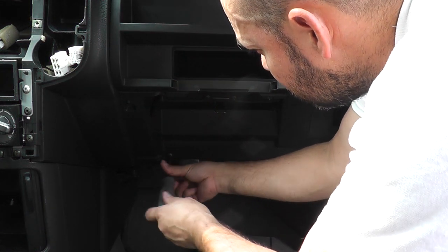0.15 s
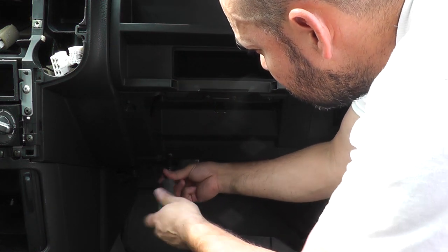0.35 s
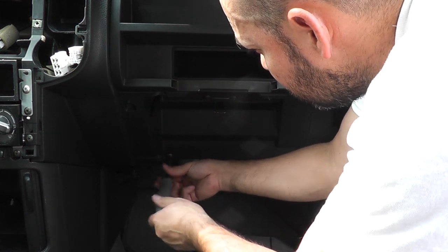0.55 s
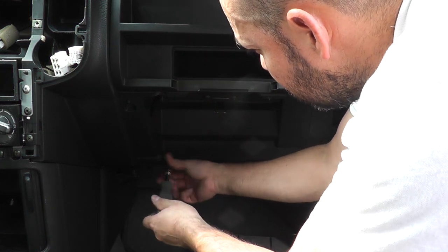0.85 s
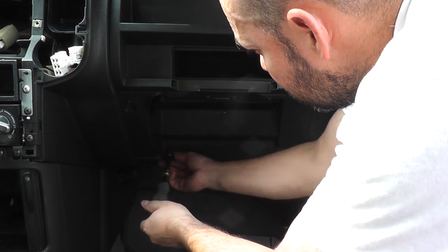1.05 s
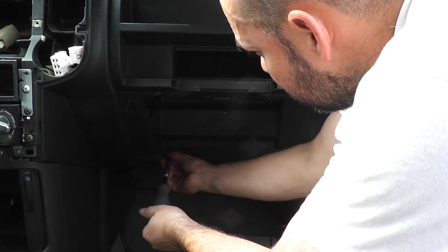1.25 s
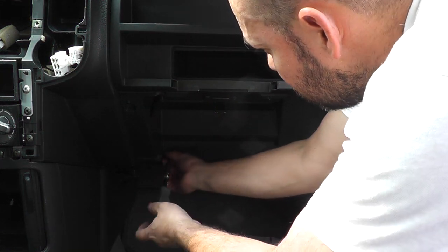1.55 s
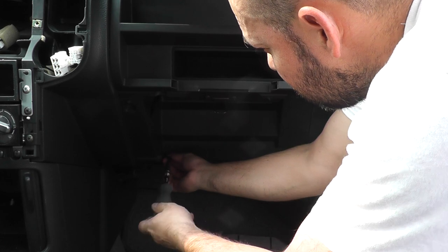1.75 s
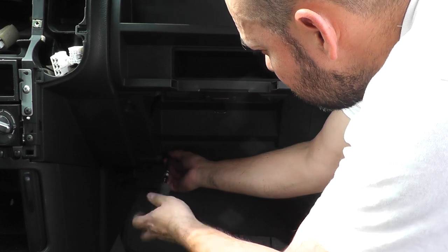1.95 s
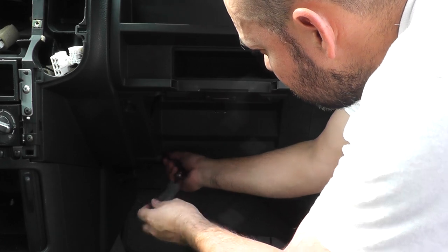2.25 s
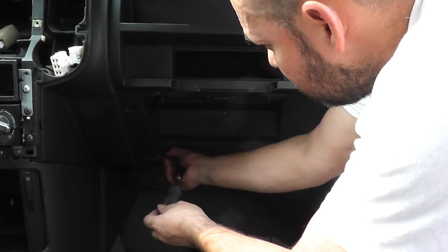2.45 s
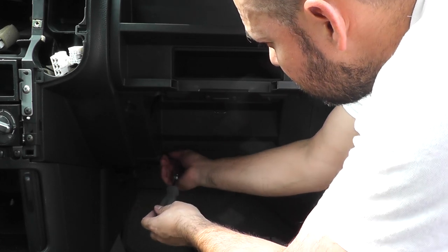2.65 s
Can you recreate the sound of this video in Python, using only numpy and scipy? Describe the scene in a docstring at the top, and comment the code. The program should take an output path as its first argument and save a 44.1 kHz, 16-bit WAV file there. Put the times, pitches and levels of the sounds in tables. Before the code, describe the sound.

Close by in a small, dry car cabin, a screwdriver loosens a screw from a plastic dashboard panel. Light knocks and handling friction come first, ease off, then give way to squeaky metallic clicks over a faint rumble and hiss.

```python
"""Unscrewing a dashboard panel

A screwdriver backs a screw out of a plastic panel inside a parked car. Friction of hand, handle
and thread drives the hollow panel's resonances, and knocks of the tool set its damped modes ringing.
The steel tip skips in the screw head, mostly late on, and stick-slip motion gives bright, squeaky
ticks. The small cabin is nearly dry, with a faint rumble and hiss."""
import sys
import numpy as np
from scipy import signal
from scipy.fft import rfft, irfft
from scipy.io import wavfile

SR = 44100
rng = np.random.default_rng(int(sys.argv[2]) if len(sys.argv) > 2 else 0)


def digitize_waveform(pressure):
    """Quantize a signal to 16-bit integers and store it at the path in sys.argv[1].

    Rows of a 2-D input are taken as channels; values are limited to [-1, 1].
    """
    field = np.atleast_2d(pressure).T
    bounded = np.clip(field, -1, 1)
    quanta = np.round(bounded * 32767).astype(np.int16)
    wavfile.write(sys.argv[1], SR, quanta)


N = 123479

# spectral envelope of the dense resonances of panel and cabin: f/Hz, level/dB
PANEL_SPECTRUM = [(40, -39.5), (100, -11), (185, -1), (260, -4), (390, -15.5), (560, -3), (780, 2),
                  (1000, -11.5), (1400, -13.5), (2100, -19.5), (2680, -22), (3050, -19.5), (3650, -20.5),
                  (5300, -21.5), (7000, -24.5), (8300, -20), (10500, -31.5), (16000, -47.5)]


def amp(db):
    """Amplitude ratio of a level in decibels."""
    return 10 ** (np.asarray(db) / 20)


def unit_energy(x):
    """Normalisation to an energy of one."""
    return x / np.sqrt(np.sum(x ** 2) + 1e-20)


def unit_rms(x):
    """Normalisation to an rms of one."""
    return unit_energy(x) * np.sqrt(len(x))


def value_at(points, hz):
    """Interpolation on a logarithmic frequency axis."""
    f, value = np.transpose(points)
    return np.interp(np.log(hz + 1), np.log(f), value)


def colour(x, points):
    """Zero-phase filtering by a curve of f/Hz, gain/dB."""
    hz = np.fft.rfftfreq(len(x), 1 / SR)
    return irfft(rfft(x) * amp(value_at(points, hz)), len(x))


def split(x, crossovers_hz):
    """Band-pass filtering into adjacent bands, low to high."""
    edges = [30, *crossovers_hz, 18000]
    return [signal.sosfilt(signal.butter(4, pair, "band", fs=SR, output="sos"), x)
            for pair in zip(edges, edges[1:])]


def add(mix, onset_s, sound):
    """Superposition of a sound from its onset on."""
    part = mix[max(round(onset_s * SR), 0):][:len(sound)]
    part += sound[:len(part)]


def rubbing():
    """Friction noise: tiny random catches, added in energy, stir the panel over smooth sliding."""
    # rubbing of hand, handle and thread: t/s, bass level/dB, middle level/dB, treble level/dB
    rub_levels = [(0, -50, -43.5, -57.5), (0.17, -46.5, -64.5, -59.5), (0.302, -49, -47, -63.5),
                  (0.351, -57, -62.5, -68.5), (0.389, -41, -46, -60), (0.54, -43.5, -44.5, -62),
                  (0.7, -49, -54, -66.5), (0.866, -40.5, -42, -57.5), (0.949, -50.5, -59.5, -71.5),
                  (1.056, -64, -61.5, -73.5), (1.097, -48, -49, -58), (1.171, -63, -59.5, -69),
                  (1.216, -62, -49, -52), (1.28, -43.5, -57, -72.5), (1.34, -52.5, -55, -67),
                  (1.57, -57, -58.5, -70.5), (1.64, -55, -52, -60), (1.7, -58.5, -58, -68),
                  (1.8, -53, -48, -65.5), (1.92, -48, -58, -67), (2.03, -52, -50.5, -68),
                  (2.11, -54, -65, -59), (2.33, -47.5, -60.5, -67.5), (2.39, -58, -71, -72.5),
                  (2.483, -47, -39, -58.5), (2.532, -66, -67, -70.5), (2.7, -53.5, -53, -62.5),
                  (2.8, -66.5, -69, -64.5)]
    catches_per_s, spread_db, catch_t60_s, sliding_db = 550, 3, 0.038, -12
    crossovers_hz, band_gains_db = [422, 1770], [-1, -5, -1.5]
    t = np.arange(N) / SR
    sizes = amp(spread_db * np.minimum(rng.exponential(1, N), 4))
    catches = sizes * (rng.random(N) < catches_per_s / SR)
    decay = amp(-60 * t[:2 ** 11] / catch_t60_s)
    envelope = np.sqrt(abs(signal.fftconvolve(catches ** 2, decay ** 2)[:N]))
    friction = (unit_rms(envelope) + amp(sliding_db)) * rng.standard_normal(N)
    bands = split(colour(friction, PANEL_SPECTRUM), crossovers_hz)
    times, *curves_db = np.transpose(rub_levels)
    return sum(unit_rms(band) * amp(np.interp(t, times, db) + gain_db)
               for band, db, gain_db in zip(bands, curves_db, band_gains_db))


def cabin_air(level_db=-57.5):
    """Stationary noise: the faint rumble and hiss of the parked car."""
    # spectrum of the cabin's still air: f/Hz, level/dB
    air_spectrum = [(20, -18), (52, 5), (200, -2.5), (400, -13), (1200, -17.5), (2300, -45), (9000, -33.5),
                    (16000, -37)]
    return amp(level_db) * unit_rms(colour(rng.standard_normal(N), air_spectrum))


def modal_ring(modes, t, age, spread_db):
    """Modal superposition: damped sinusoids, weighted anew for each point of contact."""
    phases = rng.random(len(modes))
    weights_db = spread_db * rng.standard_normal(len(modes))
    return unit_energy(sum(amp(db + weight_db - 60 * age / t60) * np.sin(2 * np.pi * (hz * t + phase))
                           for (hz, db, t60), phase, weight_db in zip(modes, phases, weights_db)))


def diffuse_ring(t):
    """Modal overlap: the panel's close resonances merge into noise whose bass lasts longest."""
    # decay of the dense resonances: f/Hz, T60/s
    decay_times = [(150, 0.27), (400, 0.032), (800, 0.054), (3500, 0.052), (9000, 0.029)]
    noise = colour(rng.standard_normal(len(t)), PANEL_SPECTRUM)
    hz, age, spectra = signal.stft(noise, SR, nperseg=128)
    decay = amp(-60 * age / value_at(decay_times, hz)[:, None])
    _, ring = signal.istft(spectra * decay, SR, nperseg=128)
    return unit_energy(ring[:len(t)])


def knocks():
    """Impact excitation: the panel's vibration builds while the tool presses, then decays freely."""
    # blows: t/s, thud, body, crack and snap level/dB, contact time/s, struck spot's resonance f/Hz
    blows = [(0.009, -58, -72, -50, -51.5, 0.00063, 5080), (0.1017, -42, -27.5, -31, -42, 0.00061, 696),
             (0.1392, -42, -48, -48.5, -62, 0.0023, 1347), (0.1525, -42, -39.5, -50, -51, 0.0011, 765),
             (0.18, -40.5, -42.5, -55.5, -55.5, 0.00096, 820), (0.378, -45.5, -42.5, -59, -66, 0.0053, 186),
             (0.4, -39, -47, -55, -68, 0.0027, 773), (0.527, -44, -59, -53.5, -51, 0.0054, 547),
             (0.536, -46, -43, -54, -53, 0.00094, 559), (0.649, -40, -47, -49, -47, 0.0014, 740),
             (0.657, -44, -45.5, -68, -55, 0.00076, 630), (0.725, -39.5, -41, -50.5, -58.5, 0.0029, 1360),
             (0.776, -39, -40.5, -47.5, -55, 0.0041, 530), (0.81, -46, -41, -51.5, -52.5, 0.0055, 504),
             (0.844, -64, -42, -52, -44, 0.002, 7720), (0.853, -43.7, -48, -59, -60, 0.0017, 527),
             (0.8792, -45, -38, -44.5, -44.5, 0.0007, 5110), (1.0809, -40, -51.5, -49.5, -80, 0.0015, 186),
             (1.2197, -53, -48, -45, -51.5, 0.00023, 1363), (1.232, -42.5, -49.5, -61, -62, 0.0049, 198),
             (1.272, -39, -48.5, -61, -69, 0.015, 133), (1.61, -50, -43.5, -69, -74, 0.003, 760),
             (1.635, -44.5, -45.5, -61, -66, 0.001, 1336), (1.753, -56, -49.5, -61.5, -65, 0.0012, 572),
             (1.778, -45, -55, -70, -72, 0.0041, 178), (1.808, -42, -70, -63, -66, 0.0032, 192),
             (1.894, -38, -39, -46, -56, 0.0006, 565), (1.978, -42, -64, -69, -77, 0.005, 152),
             (2.069, -43, -34.5, -39.5, -39.5, 0.0038, 638), (2.078, -54, -42.5, -57, -40, 0.0023, 728),
             (2.1928, -36, -47, -36.5, -33.5, 0.0023, 1436), (2.2182, -48, -55, -45, -57, 0.001, 1565),
             (2.308, -39, -38.5, -55, -70, 0.004, 722), (2.328, -40.5, -65, -71, -79, 0.0024, 330),
             (2.462, -46, -46, -58.5, -62, 0.0055, 773)]
    # modes of the panel: f/Hz, level/dB, T60/s
    panel_modes = [(133.4, -2.5, 0.18), (175.2, 3, .16), (230, 0.5, 0.15), (493.4, 0.5, 0.1),
                   (569.7, 10.5, 0.059), (740.6, 8, 0.073), (871, 4.5, 0.054), (1107, -2, 0.057),
                   (1368, -5.5, 0.057), (1733, -4.5, 0.051), (2620, -2.5, 0.036), (3506, -10, 0.048),
                   (3955, -3, 0.019)]
    crossovers_hz, band_gains_db = [362, 1330, 7120], [28.9, 28.8, 27.26, 25.3]  # thud to snap
    diffuse_db, spot_db = -1.5, -1.5
    spot_cycles = 7.7  # to fall to 1/e, for a spot at 1 kHz
    out, t = np.zeros(N), np.arange(2 ** 13) / SR
    for onset_s, *levels_db, contact_s, spot_hz in blows:
        blow = modal_ring(panel_modes, t, t, spread_db=1) + amp(diffuse_db) * diffuse_ring(t)
        spot = np.sin(2 * np.pi * spot_hz * t) * np.exp(-t * np.sqrt(spot_hz * 1000) / spot_cycles)
        press = np.clip(t / contact_s, 0, 1) ** 0.76
        for k, band in enumerate(split(blow * press, crossovers_hz)):
            if k == np.searchsorted(crossovers_hz, spot_hz):
                band = unit_energy(band) + amp(spot_db) * unit_energy(spot * press)
            add(out, onset_s, amp(levels_db[k] + band_gains_db[k]) * unit_energy(band))
    return out


def tip_slips():
    """Stick-slip excitation: the steel squeaks as the tip catches and slides, then rings out briefly."""
    # slips in the screw head: t/s, squeak level/dB, scrape level/dB, slide time/s
    slips = [(.517, -53, -55, 0.0018), (.590, -63, -52.5, 0.0029), (1.843, -78, -58, 0.0015),
             (2.071, -31.5, -38.5, 0.002), (2.079, -30.5, -38.5, 0.002), (2.102, -42, -46.5, 0.0021),
             (2.114, -42, -43.5, 0.0028), (2.128, -37.5, -45.5, 0.0068), (2.155, -40.5, -45.5, 0.011),
             (2.173, -46.5, -49.5, 0.008), (2.191, -31, -38, 0.0013), (2.2653, -42, -41.5, 0.0023),
             (2.288, -55, -55.5, .001), (2.354, -46.5, -48.5, 0.00077), (2.45, -49, -53, .001),
             (2.461, -41, -44.5, 0.0081), (2.482, -44, -48.5, 0.011), (2.527, -33.5, -52, 0.0025),
             (2.5313, -37, -46.5, 0.0015), (2.561, -40, -42.5, 0.0018), (2.578, -41.5, -52, 0.0016),
             (2.601, -53, -55.5, .001), (2.633, -56, -54, 0.0023), (2.774, -53.5, -50, 0.00072)]
    # modes of screw and shaft: f/Hz, level/dB, T60/s
    steel_modes = [(3037, -4, 0.021), (3670, 1.5, 0.035), (5380, 4.5, 0.022), (8370, -20, 0.016),
                   (9330, -1, 0.021), (9630, 13, 0.015), (9700, 0, 0.042), (10030, -3.5, 0.027)]
    # spectrum of the steel's contact noise: f/Hz, level/dB
    contact_spectrum = [(2000, -9), (3500, -11.5), (5500, -2.5), (7200, -3.5), (8400, -2), (10400, -15),
                        (11200, -17.5), (16000, -34)]
    catches_per_s, chatter_db, detune = 600, 6, 0.022
    contact_db, contact_t60_s, rise_s = -0.5, 0.033, 0.00053
    squeak_band_hz, squeak_gain_db, scrape_gain_db = [8490, 10800], 23.5, 24.5
    out, t = np.zeros(N), np.arange(2 ** 12) / SR
    rise = np.sin(np.pi / 2 * np.minimum(t / rise_s, 1)) ** 2
    for onset_s, squeak_db, scrape_db, slide_s in slips:
        age = np.maximum(t - slide_s, 0)  # decay starts when the slide ends
        grip = np.interp(t * catches_per_s, np.arange(len(t)), rng.uniform(-0.94, 1, len(t)))
        # the grip shifts the modes from slip to slip and during the slide
        pitch = 1 + detune * (2 * rng.random() - 1 + grip * (t < slide_s))
        noise = colour(rng.standard_normal(len(t)), contact_spectrum)
        contact = unit_energy(noise * amp(-60 * age / contact_t60_s))
        ring = modal_ring(steel_modes, np.cumsum(pitch) / SR, age, spread_db=4)
        tick = (ring + amp(contact_db) * contact) * rise * amp(chatter_db * grip)
        low, squeak, high = split(tick, squeak_band_hz)
        add(out, onset_s, amp(scrape_db + scrape_gain_db) * unit_energy(low + high))
        add(out, onset_s, amp(squeak_db + squeak_gain_db) * unit_energy(squeak))
    return out


def unscrewing():
    """Superposition of what tool and panel radiate in one direction."""
    return knocks() + tip_slips() + rubbing()


def scene():
    """Mid-side stereophony: the work lies ahead, and decorrelated sound from the sides gives width."""
    # side relative to mid, for tool and panel: f/Hz, level/dB
    work_width = [(60, -13), (170, -15), (350, -6), (700, -16), (1400, -12), (2800, -17), (5500, -20),
                  (9000, -16), (14000, -13)]
    # side relative to mid, for the still air: f/Hz, level/dB
    air_width = [(60, -10.5), (550, 6.5), (4970, -6.5)]
    # left relative to right: f/Hz, level/dB
    balance = [(200, -1.2), (700, 1.5), (3000, -0.9), (9000, 0.9)]
    mid = unscrewing() + cabin_air()
    side = colour(unscrewing(), work_width) + colour(cabin_air(), air_width)
    left = colour(mid + side, [(hz, db / 2) for hz, db in balance])
    right = colour(mid - side, [(hz, -db / 2) for hz, db in balance])
    return np.array([left, right])


def record(dry):
    """Band limiting: a linear-phase low-pass filter removes the highest treble."""
    cutoff_hz = 15900
    low_pass = signal.firwin(511, cutoff_hz, window=("kaiser", 9), fs=SR)
    return signal.oaconvolve(dry, low_pass[None], "same")


dry = scene()
out = record(dry)
digitize_waveform(out)
```